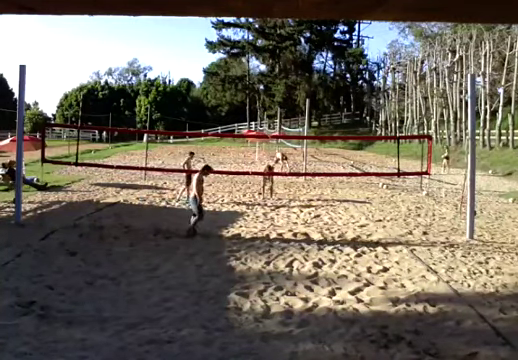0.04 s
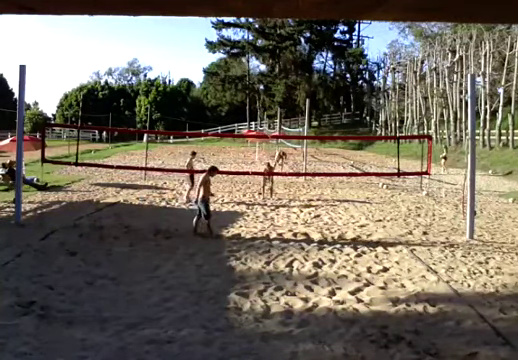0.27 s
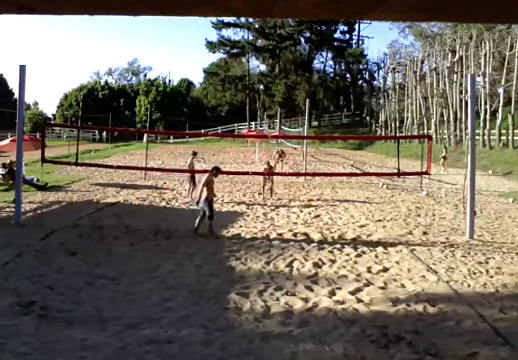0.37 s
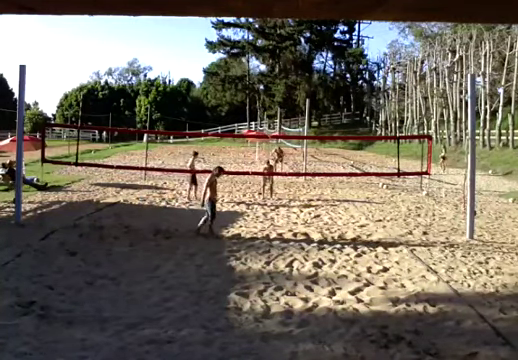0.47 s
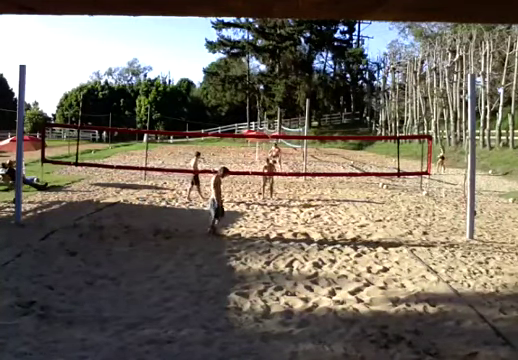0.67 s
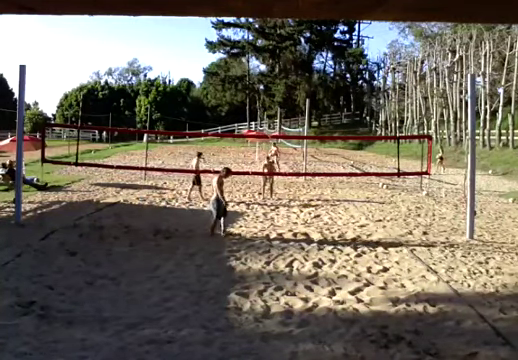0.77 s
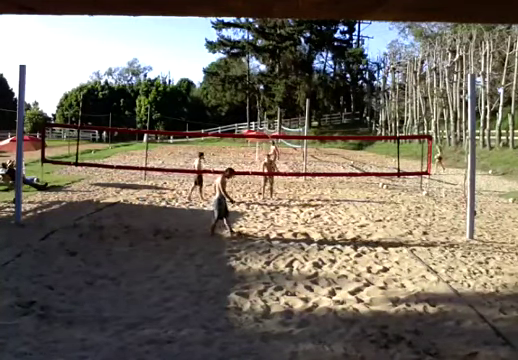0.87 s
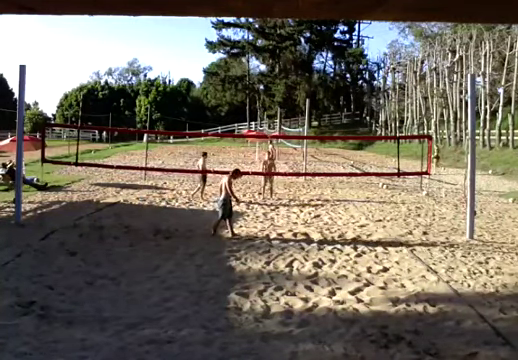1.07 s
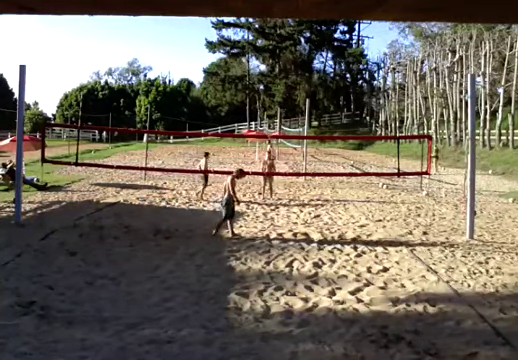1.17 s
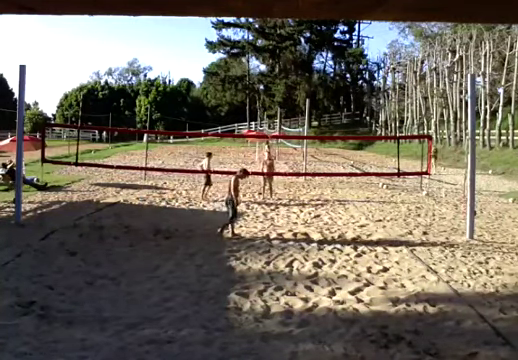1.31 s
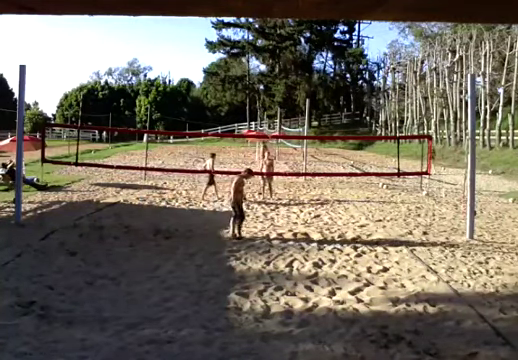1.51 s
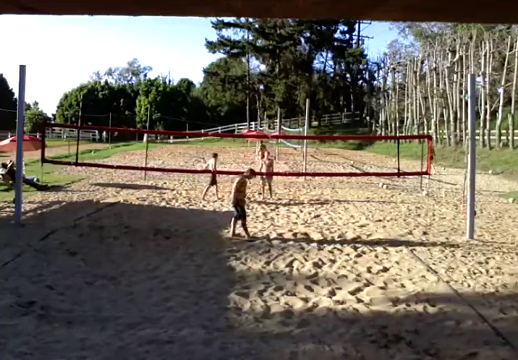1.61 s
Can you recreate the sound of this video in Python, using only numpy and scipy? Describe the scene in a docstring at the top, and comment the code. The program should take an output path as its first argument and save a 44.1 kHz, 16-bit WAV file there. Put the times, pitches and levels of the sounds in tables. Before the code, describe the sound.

A volleyball is slapped by a hand at about 0.22 s: two sharp cracks almost fused together, with a short hollow thud. A strong slapback follows near 0.26 s, then weaker reflections and a grainy tail fading by roughly 0.8 s, with a faint late return around 0.55 s. Quiet outdoor hiss runs throughout, with tiny wavering bird chirps before the hit and scattered from 0.55 to 1.5 s. The loud peak clips slightly.

```python
"""An outdoor hiss of shaped noise, its level drifting, runs throughout a sand court scene.
Small birds chirp over it from near the start: wavering sine glides, blurred by the trees.
A hand then slaps a volleyball: two sharp cracks 10 ms apart, each a close pair of pulses with noisy rasps.
The ball answers with a hollow thud, a noise burst over damped modes.
Nearby surfaces throw the slap back as delayed pulses; court and trees scatter a grainy, decaying tail."""
import sys
import numpy as np
from scipy import signal
from scipy.fft import rfft, irfft
from scipy.io import wavfile

SR = 44100
rng = np.random.default_rng(int(sys.argv[2]) if len(sys.argv) > 2 else 0)


def bounce(signal):
    """Save signal as a 16-bit WAV file at the path given by the first command-line argument."""
    frames = np.transpose(np.atleast_2d(signal))
    limited = np.clip(frames, -1, 1)
    pcm = np.round(limited * 32767).astype(np.int16)
    wavfile.write(sys.argv[1], SR, pcm)


N = 72765
T = np.arange(N) / SR  # time in seconds

# Relative spectrum of the hiss before its band limits: frequency_hz, density_db
AIR_SPECTRUM = [(41, -63), (70, -44), (218, 0), (288, -3.5), (374, -4), (418, -0.5), (533, -2), (803, 2),
                (1170, -2.5), (1930, -4), (2850, -14.5), (3310, -11.5), (3910, -8), (4620, -7),
                (6000, -23.5)]
# Course of the hiss level, before band limits and swell: time_s, level_db
AIR_LEVEL_COURSE = [(0, -48), (.2, -49.5), (.5, -41.5), (.9, -45), (1.3, -43.5), (1.65, -43)]
# Bird chirps, each a pitch glide through a middle pitch: start_s, length_s, start_hz, mid_hz, end_hz,
# mid_at (share of length), waver (share of pitch), level_db (before the tree tail)
BIRD_CHIRPS = [(.068, 0.015, 4300, 4090, 3900, .4, .02, -51.5),
               (.085, 0.062, 4000, 3860, 3600, 0.28, .07, -55.5),
               (0.135, 0.016, 5100, 4910, 3700, 0.35, .03, -51.5),
               (0.151, 0.033, 3400, 4590, 4750, 0.82, .03, -48),
               (0.551, 0.025, 6100, 6200, 5860, 0.4, .035, -55.5),
               (.585, .036, 3600, 4530, 4440, .49, .04, -42.5),
               (.632, 0.035, 5500, 5000, 4520, .4, .025, -48.5),
               (0.711, 0.06, 4700, 4940, 4310, .18, .055, -47),
               (0.778, .06, 4200, 3980, 3230, 0.19, .07, -49),
               (1.013, .046, 3100, 4600, 4750, .6, 0.022, -48),
               (1.054, .018, 4750, 4300, 3100, .3, .03, -49), (1.101, .032, 2950, 3474, 3800, .7, .02, -51),
               (1.119, .014, 3300, 4200, 3900, .7, .02, -48.5),
               (1.124, .02, 3550, 3300, 2950, 0.34, .02, -54),
               (1.246, 0.055, 4200, 5380, 4170, 0.55, 0.016, -50.5),
               (1.248, 0.049, 5100, 5960, 5100, .42, 0.022, -56.5),
               (1.267, 0.029, 4100, 3790, 3460, .4, .07, -51.5),
               (1.363, 0.065, 4100, 4830, 4430, 0.32, .015, -43),
               (1.453, .042, 3000, 4150, 4140, .7, .022, -53)]
# Contacts of hand and cover: start_s, click_db, rasp_db, rasp_decay_s, thump_db, ping_db
SLAP_CONTACTS = [(0.2164, 8, 2, .008, -6, -1), (0.2175, -3.5, 3, 0.0024, -13, -10),
                 (0.2267, 9.5, 7.5, 0.0011, -9, -18), (0.228, 10, 4, 0.0045, -12, -18)]
# Relative spectrum of the contacts: frequency_hz, level_db
CONTACT_SPECTRUM = [(60, -24), (170, -1), (380, -9.5), (520, -3), (700, -4.5), (940, -1.5), (1230, -7),
                    (1580, -1.5), (1900, -.5), (2740, 6.5), (3200, 0), (3750, 0), (4180, 6.5), (4600, -1),
                    (4950, .5), (5450, -11), (6200, -11), (8500, -20.5), (10200, -37), (13100, -31),
                    (15000, -42)]
# Relative spectrum of the hollow thud: frequency_hz, level_db
THUD_SPECTRUM = [(60, -32), (300, -5), (500, 4.5), (850, 6), (1080, -6), (1380, 0), (1900, -1),
                 (2700, -4.5), (3500, -0.5), (3850, -5), (4230, 4), (4700, -4), (5500, -11.5), (7200, -18),
                 (9500, -29), (15000, -47)]
# Resonances of the ball: frequency_hz, level_db, t60_s (time to fall 60 dB)
BALL_RESONANCES = [(184, 0, .042), (300, -9, .06), (500, 1.5, 0.047), (745, 5, .028), (885, 5.5, .03),
                   (1287, -3, .075), (1605, -13, .04), (2760, -11, .015), (4330, -4, .02)]
# Diffuse returns from the court and the trees: start_s, level_db, rise_s, decay_s
DIFFUSE_RETURNS = [(.235, 1.5, .0078, 0.11), (.32, -1.2, .0078, .095), (.55, -7, 0.035, 0.07),
                   (.69, -8.5, 0.084, 0.013)]
# Relative spectrum of the diffuse returns: frequency_hz, level_db
DIFFUSE_SPECTRUM = [(60, -28), (110, -13.5), (300, -7.5), (470, -2.5), (650, -5), (1270, 1.5), (1900, -3.5),
                    (2800, -7.5), (4200, 0.5), (5100, -4.5), (5900, -15.5), (8000, -21.5), (10000, -27),
                    (14000, -34.5)]
# Echoes from nearby surfaces: start_s, click_db, scatter_db, scatter_decay_s
NEAR_ECHOES = [(.257, -1, 2, 0.0048), (0.2783, -12.5, -7.5, .005), (.284, -14.5, -11, 0.0015),
               (.326, -19, -15, .002), (0.3364, -22, -14, 0.0021)]
# Relative spectrum of the near echoes: frequency_hz, level_db
NEAR_SPECTRUM = [(80, -26), (195, 3), (270, -5.5), (440, -1), (540, -4), (830, 1.5), (1080, -1.5),
                 (1270, 5.5), (1550, -6), (2700, -10), (3600, -6), (4100, -5.5), (4650, -.5), (5200, -7.5),
                 (6000, -25), (8000, -25.5), (10000, -51), (14000, -52)]

AIR_LOW_HZ, AIR_TOP_HZ, TREBLE_HISS_DB = 144, 5550, -29.5
AIR_SWELL_DB, AIR_SWELL_HZ = .5, 9.63
RISE_CURVE, FALL_CURVE = 3.29, 2.97  # before and after the middle; higher = pitch stays near it longer
WAVER_HZ, CHIRP_EDGE_S = 693, 0.0039
BIRD_WET_DB, BIRD_DECAY_S = -9, .05
COVER_HZ, COVER_Q = 3130, 1.3  # the cover flexes and smears each crack around this pitch
THUMP_HZ, THUMP_DECAY_S, THUMP_RISE_S = 182, .0045, .0006
PING_HZ, PING_DECAY_S = 1610, 0.0027
RASP_RISE_S = 0.00026
THUD_S, THUD_DB, THUD_HOLD_S, THUD_DECAY_S = .2305, 9, 0.0035, 0.0043
BALL_RISE_S = .0008
SCATTER_GRAIN_DB = 3.5  # spread in strength between single reflections
MIC_LOW_HZ, TOP_HZ = 75, 15200


def undb(db):
    """Decibel law: amplitude ratio is ten to the power of level over twenty."""
    return 10 ** (np.asarray(db) / 20)


def unit(x):
    """Energy normalization: the squared samples sum to one."""
    return x / np.sqrt(np.sum(x ** 2) + 1e-18)


def delay(x, seconds):
    """Propagation delay: the same waveform arrives later."""
    return np.concatenate([np.zeros(int(seconds * SR)), x])[:N]


def convolve(x, response):
    """Superposition: each sample launches a scaled copy of the response."""
    return signal.fftconvolve(x, response)[:N]


def butterworth(x, order, hz, kind="low"):
    """Band limiting: a maximally flat filter attenuates one side of a cutoff."""
    return signal.sosfilt(signal.butter(order, hz, kind, fs=SR, output="sos"), x)


def click(spectrum):
    """Minimum phase: the most front-loaded causal pulse with a given spectrum."""
    hz, db = np.array(spectrum).T
    size = 4096
    f = np.maximum(np.arange(size // 2 + 1) * SR / size, 1)
    gain = undb(np.interp(np.log(f), np.log(hz), db))
    # Folding the cepstrum onto positive time makes the pulse causal
    cepstrum = irfft(np.log(gain))
    cepstrum[1:size // 2] *= 2
    cepstrum[size // 2 + 1:] = 0
    pulse = irfft(np.exp(rfft(cepstrum)))
    return unit(np.pad(pulse, (0, N - size)))


def burst(pulse, decay_s, rise_s=0., hold_s=0., grain_db=0.):
    """Random superposition: dense pulses of random sign rise, hold and decay exponentially."""
    rise = np.minimum((T + 1 / SR) / (rise_s + 1 / SR), 1)
    fall = np.exp(-np.maximum(T - rise_s - hold_s, 0) / decay_s)
    sign, size = rng.standard_normal((2, N))
    grains = np.sign(sign) * undb(grain_db * size)
    return unit(convolve(grains * rise * fall, pulse))


def ring(hz, decay_s, rise_s=0.):
    """Damped resonance: a sinusoid decays exponentially after a short rise."""
    rise = np.minimum(T / (rise_s + 1 / SR), 1)
    return unit(np.sin(2 * np.pi * hz * T) * np.exp(-T / decay_s) * rise)


def walk(rate_hz):
    """Random modulation: straight lines join normal random values at a given rate."""
    return np.interp(T * rate_hz, np.arange(N), rng.standard_normal(N))


def flex(x):
    """All-pass dispersion: delay varies with frequency while the spectrum stays the same."""
    _, poles = signal.iirpeak(COVER_HZ, COVER_Q, fs=SR)
    return signal.lfilter(poles[::-1], poles, x)


def air():
    """Filtered noise: outdoor hiss with little bass, a trace of high treble and a slight swell."""
    noise = rng.standard_normal(N)
    hiss = irfft(rfft(noise) * rfft(click(AIR_SPECTRUM)), N)
    hiss = butterworth(hiss, 16, AIR_TOP_HZ)
    hiss = butterworth(hiss, 4, AIR_LOW_HZ, "high")
    treble = butterworth(rng.standard_normal(N), 2, AIR_TOP_HZ, "high")
    level_db = np.interp(T, *np.array(AIR_LEVEL_COURSE).T) + AIR_SWELL_DB * walk(AIR_SWELL_HZ)
    return (hiss + undb(TREBLE_HISS_DB) * treble) * undb(level_db)


def birds():
    """Frequency modulation: wavering sinusoids glide in pitch and are blurred by the trees."""
    out = np.zeros(N)
    for start_s, length_s, start_hz, mid_hz, end_hz, mid_at, waver, level_db in BIRD_CHIRPS:
        u = np.clip((T - start_s) / length_s, 0, 1)  # progress through the chirp
        before_mid = np.maximum(1 - u / mid_at, 0) ** RISE_CURVE
        after_mid = np.maximum((u - mid_at) / (1 - mid_at), 0) ** FALL_CURVE
        glide_hz = mid_hz + (start_hz - mid_hz) * before_mid + (end_hz - mid_hz) * after_mid
        pitch_hz = glide_hz * (1 + waver * walk(WAVER_HZ))
        envelope = np.minimum(np.minimum(u, 1 - u) * length_s / CHIRP_EDGE_S, 1)
        whistle = np.sqrt(2) * np.sin(2 * np.pi * np.cumsum(pitch_hz) / SR)
        out += undb(level_db) * envelope * whistle
    trees = unit(rng.standard_normal(N) * np.exp(-T / BIRD_DECAY_S))
    return out + undb(BIRD_WET_DB) * convolve(out, trees)


def slap():
    """Impact excitation: skin cracks on the cover and pushes it in; the ball thuds and rings."""
    crack = flex(click(CONTACT_SPECTRUM))
    out = np.zeros(N)
    for start_s, click_db, rasp_db, decay_s, thump_db, ping_db in SLAP_CONTACTS:
        rasp = undb(rasp_db) * burst(crack, decay_s, rise_s=RASP_RISE_S)
        thump = undb(thump_db) * ring(THUMP_HZ, THUMP_DECAY_S, THUMP_RISE_S)
        ping = undb(ping_db) * ring(PING_HZ, PING_DECAY_S)
        out += delay(undb(click_db) * crack + rasp + thump + ping, start_s)
    thud = undb(THUD_DB) * burst(click(THUD_SPECTRUM), THUD_DECAY_S, hold_s=THUD_HOLD_S)
    modes = np.zeros(N)
    for hz, level_db, t60_s in BALL_RESONANCES:
        modes += undb(level_db) * ring(hz, t60_s / np.log(1000), BALL_RISE_S)
    return out + delay(thud + modes, THUD_S)


def echoes():
    """Reflection and scattering: grainy diffuse returns join distinct echoes from nearby surfaces."""
    out = np.zeros(N)
    far = click(DIFFUSE_SPECTRUM)
    for start_s, level_db, rise_s, decay_s in DIFFUSE_RETURNS:
        tail = burst(far, decay_s, rise_s, grain_db=SCATTER_GRAIN_DB)
        out += delay(undb(level_db) * tail, start_s)
    near = flex(click(NEAR_SPECTRUM))
    for start_s, click_db, scatter_db, decay_s in NEAR_ECHOES:
        scatter = undb(scatter_db) * burst(near, decay_s)
        out += delay(undb(click_db) * near + scatter, start_s)
    return out


def scene():
    """Linear superposition: hiss, birds, slap and echoes add at one point."""
    return (air() + birds() + slap() + echoes())[None]


def record(dry):
    """Saturation and band limiting: the microphone clips peaks and loses deep bass; the top is cut."""
    clipped = np.clip(dry, -1, 1)
    thin = butterworth(clipped, 2, MIC_LOW_HZ, "high")
    return signal.sosfilt(signal.ellip(12, .2, 80, TOP_HZ, fs=SR, output="sos"), thin)


dry = scene()
out = record(dry)
bounce(out)
```